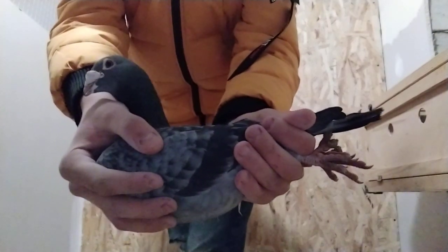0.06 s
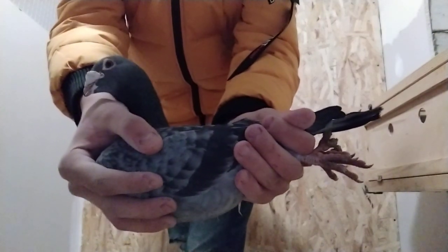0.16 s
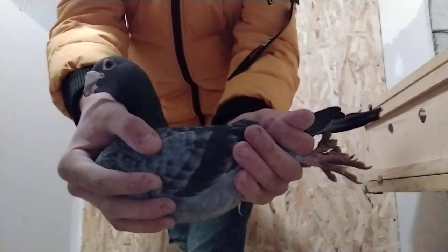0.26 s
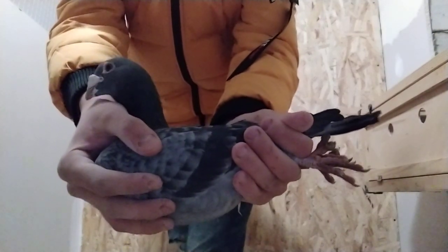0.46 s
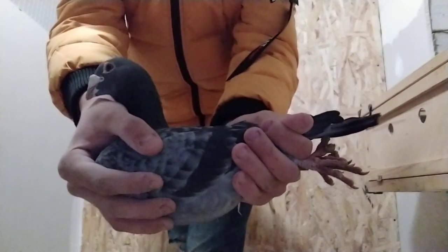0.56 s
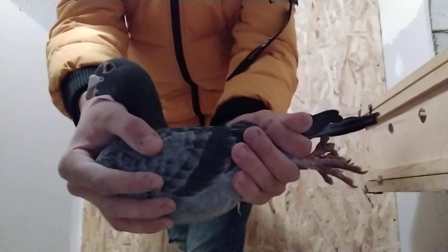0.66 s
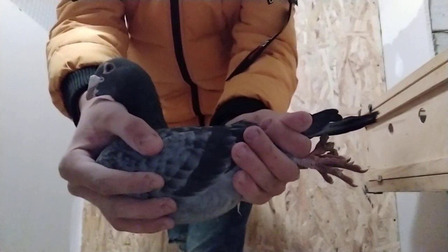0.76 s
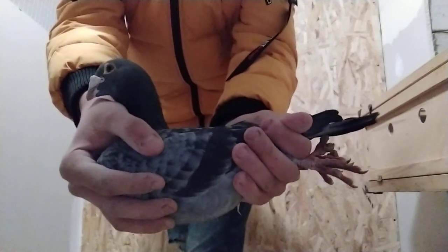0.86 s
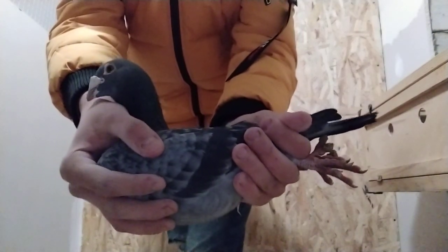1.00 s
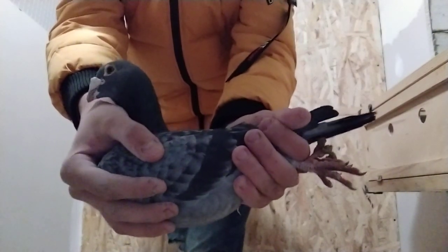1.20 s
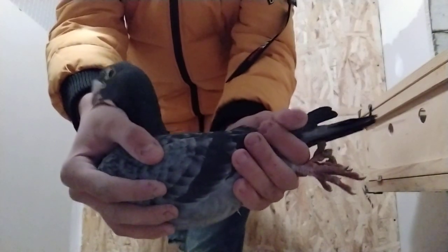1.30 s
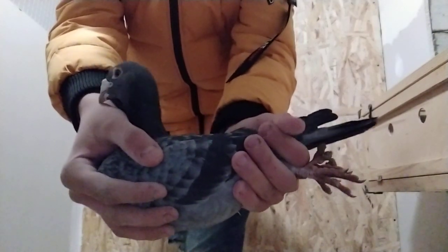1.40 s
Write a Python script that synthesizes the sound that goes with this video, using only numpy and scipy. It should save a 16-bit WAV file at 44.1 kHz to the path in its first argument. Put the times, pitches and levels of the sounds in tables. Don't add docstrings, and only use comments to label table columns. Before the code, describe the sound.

A pigeon coos in soft throaty pulses, then a wooden knock rattles in a small loft

```python
import sys
import numpy as np
from scipy import signal
from scipy.fft import rfft, irfft
from scipy.io import wavfile
from scipy.ndimage import uniform_filter1d, map_coordinates

SR = 44100
rng = np.random.default_rng(int(sys.argv[2]) if len(sys.argv) > 2 else 0)


def undo_db(level):
    steps = np.asarray(level, float) / 20
    return 10 ** steps


def wav_out(sig):
    wavfile.write(sys.argv[1], SR, np.round(np.clip(np.atleast_2d(sig).T, -1, 1) * 32767).astype(np.int16))


N = 63945
T = np.arange(N) / SR
PORTS = np.array([[1], [-1]])


def shape(x, points):
    hz, db = np.transpose(points)
    bins = np.maximum(np.fft.rfftfreq(x.shape[-1], 1 / SR), 1)
    gain = undo_db(np.interp(np.log(bins), np.log(hz), db))
    return irfft(rfft(x) * gain, x.shape[-1])


def unit(x):
    return x / np.sqrt(np.mean(x ** 2))


def walk(rate):
    hold = max(int(SR / rate), 40)
    steps = np.repeat(rng.standard_normal(N // 40 + 1), hold)[:N]
    return 1.52 * uniform_filter1d(uniform_filter1d(steps, hold), hold)


def place(x, pan_db, lag_ms):
    def late(share):
        return map_coordinates(x, [np.arange(N) - share * lag_ms * SR / 2000], order=3)
    return np.array([late(0.87) * undo_db(pan_db / 2), late(-1.044) * undo_db(-pan_db / 2)])


def pair(points, split_hz):
    middle, side = rng.standard_normal((2, N))
    side = shape(side, [(split_hz / 8, -14), (split_hz, 0)])
    return unit(shape(middle + side * PORTS, points))


def coo(curve, rough_db):
    # frequency in Hz, level in dB.
    throat = [(180, -1), (400, -6), (460, -9.5), (500, -20.5), (560, -21), (690, -29), (900, -41)]
    s, pitch, db = np.transpose(curve)
    throat_hz, throat_db = np.transpose(throat)
    hz = uniform_filter1d(np.interp(T, s, pitch), 200) * (1 + 0.0026 * rough_db * walk(61.1))
    level_db = np.interp(T, s, db, -120, -120) + rough_db * walk(90.96)
    env = uniform_filter1d(undo_db(level_db), 150)
    phase = 2 * np.pi * np.cumsum(hz) / SR
    voice = np.cos(phase)
    for k in (2, 3):
        voice += undo_db(np.interp(np.log(k * hz), np.log(throat_hz), throat_db)) * np.cos(k * phase)
    return np.sqrt(2) * env * voice


def early_coos():
    # time in seconds, pitch in Hz, level in dB.
    far_curve = [(0, 205.3, -54.5), (.04, 233.2, -65), (.06, 196.7, -56), (.09, 224.8, -48.5),
                 (.115, 249, -49), (.14, 314, -53), (.162, 371, -50.5), (.185, 379, -52.5),
                 (.21, 416, -68.5)]
    # time in seconds, pitch in Hz, level in dB.
    thin_curve = [
        (.4, 640, -66),
        (.43, 660, -59),
        (.48, 652, -58),
        (.495, 640, -68),
    ]
    return coo(far_curve, rough_db=3.5) + coo(thin_curve, rough_db=2.3)


def late_coos():
    # time in seconds, pitch in Hz, level in dB.
    long_curve = [(.494, 482.6, -52), (.506, 397.8, -38), (.52, 312.3, -38), (.546, 298.2, -36.5),
                  (.562, 255.2, -31.5), (.59, 229.8, -29.5), (.662, 229.6, -32), (.686, 196.6, -48),
                  (.7, 200, -47)]
    # time in seconds, pitch in Hz, level in dB.
    tail_curve = [(.7, 199.8, -46), (.715, 206.6, -47.5), (.735, 229, -42.5), (.762, 222.4, -44.5),
                  (.778, 206, -55.5), (.8, 226.7, -61.5), (.835, 239, -47), (.865, 233, -92.5)]
    return coo(long_curve, rough_db=0.83) + coo(tail_curve, rough_db=1.04)


def gulps():
    # centre in seconds, pitch in Hz, peak in dB, length in ms.
    pulses = [(0.248, 363, -25.5, 4.5), (0.262, 310, -42.5, 4.4), (0.283, 381, -30.5, 6.8),
              (0.303, 350, -34.5, 1.5), (0.317, 369.4, -37.5, 13.6), (0.349, 261.6, -27, 8.8),
              (0.378, 304, -32, 9.4), (0.393, 296, -41, 10.7), (0.418, 320, -43.5, 5.6),
              (.44, 290, -50.5, 8.9), (0.492, 278, -48, 24), (.54, 402, -37, 7.8), (0.567, 296, -35, 4.5),
              (0.595, 294, -40, 22), (.68, 376, -42.5, 9.1), (.708, 423, -48.5, 8.8),
              (0.734, 395, -45.5, 11), (.75, 455, -46, 13), (.38, 510, -46, 11), (.1, 453, -49.5, 16)]
    octave_db, rasp_db, rasp_extra_ms = -27, -18, 6
    breath = rng.standard_normal(N)
    rasp = unit(shape(breath, [(250, -31.5), (380, 5.5), (520, 7.5), (700, -39.5)]))
    out = np.zeros(N)
    for s, hz, db, ms in pulses:
        since_ms = (T - s) * 1000
        phase = 2 * np.pi * (hz * (T - s) + rng.random())
        tone = np.cos(phase) + undo_db(octave_db) * np.cos(2 * phase)
        out += undo_db(db) * np.exp(-(since_ms / ms) ** 2) * tone
        out += undo_db(db + rasp_db) * np.exp(-(since_ms / (ms + rasp_extra_ms)) ** 2) * rasp
    return out


def rustle_strokes():
    # start in seconds, claw, feather and hollow board levels in dB, length in ms.
    moves = [(0.032, -54.5, -60, -70, 17), (0.036, -56, -54, -88, 1.1), (0.0442, -62, -47.5, -79, 1.1),
             (.058, -65, -64.5, -65, 10.4), (0.143, -83, -67.5, -78, 8), (0.196, -63.5, -63, -57, 25),
             (0.209, -68.5, -74, -66, 9.1), (.252, -82.5, -56, -79.5, 17), (0.263, -68.5, -57, -62.5, 42),
             (0.276, -79, -53.5, -76, 2.7), (0.372, -59, -69, -58, 8.8), (0.381, -65.5, -80, -56.5, 10.5),
             (0.446, -100, -69.5, -81, 4.5), (0.55, -63.5, -67, -86, 13.4), (0.59, -64, -75.5, -68, 6.3),
             (0.639, -58.5, -74, -69.5, 8.6), (0.734, -66, -71, -76.5, 7.6), (0.764, -52, -59, -63.5, 24.3),
             (0.778, -47.5, -51, -61, 10.7), (0.824, -54, -54, -59, 19), (0.833, -65, -56, -85, 4),
             (0.89, -53, -78, -47, 9), (0.913, -69, -68, -63.5, 13), (1.088, -55, -59, -52.5, 16.6),
             (1.118, -51.5, -58, -78, 8.5), (1.139, -37.5, -44.5, -47, 16.3), (1.19, -55, -58, -64, 9.2),
             (1.215, -60.5, -66, -54, 26), (1.314, -51.5, -51, -82, 20.4), (1.321, -57, -53, -77, 1.8),
             (1.332, -60, -45, -78, 2), (1.343, -51.5, -58.5, -64.5, 13.7), (1.44, -55.5, -71, -68, 12)]
    envs = np.zeros((3, N))
    for s, *levels_db, ms in moves:
        u = np.clip((T - s) * 1000 / ms, 0, 40)
        stroke = 2.105 * (1 - np.exp(-u / 0.24)) * np.exp(-u)
        envs += undo_db(levels_db)[:, None] * stroke
    return envs


def claws_on_board(claw_env, board_env):
    # frequency in Hz, density in dB per Hz.
    scratch = [(200, -5), (400, 9), (600, -2.5), (850, 4.5), (1300, -0.5), (2200, -4), (3500, -7.5),
               (6500, -17)]
    # frequency in Hz, density in dB per Hz.
    hollow = [(450, -24), (600, 5), (700, -13.5), (835, 6), (890, -0.5), (960, 1.5), (1200, -7.5),
              (1700, -47.5)]
    scrape = unit(shape(rng.standard_normal(N), scratch + [(10000, -53)])) * claw_env
    hum = unit(shape(rng.standard_normal(N), hollow)) * board_env
    return (scrape + hum) * undo_db(2 * walk(300))


def feathers_and_jacket(feather_env):
    # frequency in Hz, density in dB per Hz.
    vanes = [(2000, -6), (3500, -13.5), (5500, -16.5), (7500, -4.5), (9200, 0.5), (10300, -6.5),
             (11800, -20.5), (15500, -50.5)]
    # frequency in Hz, density in dB per Hz.
    fabric = [(1500, -13.5), (3000, -12.5), (6000, -14), (9000, 0.5), (10500, -10), (13500, -18.5),
              (15500, -14.5)]
    # time in seconds, level in dB.
    sleeve = [(0.862, -72), (.95, -61.5), (1.049, -56.5), (1.125, -57), (1.22, -73), (1.3, -63.5),
              (1.45, -64)]
    s, db = np.transpose(sleeve)
    cloth = pair(fabric, 2700) * undo_db(np.interp(T, s, db, -120) + 1.7 * walk(25))
    rustle = pair(vanes, 2300) * feather_env * undo_db(2 * walk(400))
    return (rustle + cloth) * undo_db(-4.5 / 2 * PORTS)


def knock():
    # time in seconds, peak in dB, push in ms, favoured Hz of the spot struck.
    blows = [
        (1.139, -30, 0.096, 1960),
        (1.1426, -32.5, .2, 453),
        (1.145, -24.5, 0.12, 840),
        (1.150, -29, 0.22, 795),
        (1.156, -27, 0.11, 1900),
        (1.161, -28.5, 0.62, 123),
        (1.166, -24, 0.61, 810),
        (1.188, -34.5, .6, 423),
        (1.217, -39, 0.75, 556),
    ]
    # frequency in Hz, level in dB, 60 dB decay in seconds.
    modes = [(119, -3.5, 0.064), (350, -8, 0.089), (424, -9, 0.065), (520, -10.5, .05), (680, -14, 0.035),
             (795, -1.5, 0.028), (839, 1.5, 0.039), (1134, -3, 0.04), (1294, -1.5, 0.018),
             (1510, -10, 0.01), (1678, -2, 0.021), (1960, -7.5, 0.054), (2303, -12.5, 0.094),
             (2884, -10.5, 0.027)]
    mode_hz, mode_db, t60 = np.transpose(modes)
    u = np.arange(SR // 4) / SR
    decay = np.exp(-np.log(1000) * u / t60[:, None])
    ringing = np.sin(2 * np.pi * mode_hz[:, None] * u) * decay
    out = np.zeros(N)
    for s, db, push_ms, spot_hz in blows:
        chance = rng.standard_normal(len(modes))
        octaves_away = np.abs(np.log2(mode_hz / spot_hz))
        gain = undo_db(mode_db + 2.0 * chance - 3.5 * octaves_away) * np.sign(chance[::-1])
        ring = (gain / (1 + (mode_hz * push_ms / 1000) ** 2)) @ ringing
        i = int(s * SR)
        out[i:i + len(u)] += undo_db(db) * ring[:N - i]
    return out


def floor_thuds():
    # centre in seconds, frequency in Hz, peak in dB, length in ms.
    steps = [
        (0.406, 105.7, -57, 19),
        (0.67, 51, -61.5, 25),
        (0.907, 61.3, -55.5, 28),
        (0.91, 165, -56.5, 51),
        (1.21, 165, -50, 21),
    ]
    out = np.zeros(N)
    for s, hz, db, ms in steps:
        out += undo_db(db) * np.exp(-((T - s) * 1000 / ms) ** 2) * np.sin(2 * np.pi * hz * T)
    return out * undo_db([[2.1], [-2.2]])


def other_birds():
    mutter = pair([(150, -27), (220, 7), (520, 2.5), (800, -38.5)], 1100)
    fade_db = np.interp(T, [0, .47, .6, .98, 1.1, 1.36], [4.0, -5.5, 0.5, -18.5, -28, -11])
    return mutter * undo_db(-54.5 + fade_db + 3.0 * walk(23.27)) * undo_db(2.4 * PORTS)


def room_tone():
    # frequency in Hz, density in dB per Hz.
    air = [(20, -2.5), (60, -1), (85, -15.5), (200, 2.5), (420, -14), (1400, -23), (5400, -42.5),
           (9300, -28), (11200, -59.5), (15500, -105)]
    return undo_db(-59.5 + 1.5 * walk(6.9)) * pair(air, 1600) * undo_db(2.1 * PORTS)


def room(x):
    # frequency in Hz, 60 dB decay in seconds.
    decays = [(150, 0.53), (600, 0.21), (2500, 0.18), (9000, 0.14)]
    decay_hz, decay_s = np.transpose(decays)
    u = np.arange(SR // 2) / SR
    tail = np.zeros((2, len(u)))
    for hz in 125 * 2 ** np.arange(7):
        middle, side = rng.standard_normal((2, len(u)))
        noise = middle + min(hz / 600, 1) * side * PORTS
        band = unit(shape(noise, [(hz / 2, -30), (hz / 1.503, 0), (hz * 1.26, 0), (hz * 2, -30)]))
        t60 = np.interp(np.log(hz), np.log(decay_hz), decay_s)
        tail += np.sqrt(hz) * band * np.exp(-np.log(1000) * u / t60)
    tail *= np.clip(u / 0.0038 - .6, 0, 1)
    tail /= np.sqrt(np.sum(tail ** 2) / 2)
    return undo_db(-3.5) * signal.fftconvolve(x[None], tail, axes=1)[:, :N]


def scene():
    pulses = gulps()
    turn = np.clip((T - .46) / .02, 0, 1)
    early = early_coos() + pulses * (1 - turn)
    late = late_coos() + pulses * turn
    claw_env, feather_env, board_env = rustle_strokes()
    claws = claws_on_board(claw_env, board_env)
    feathers = feathers_and_jacket(feather_env)
    box = knock()

    send = undo_db(-5.5) * (early + late) + claws + undo_db(-6.5) * box + undo_db(-3.5) * feathers[1]
    wet = shape(room(send), [(130, -16), (240, -8), (330, 0.011)])
    birds = place(early, 5.5, .35) + place(late, 5.5, -0.32)
    wood = place(claws + box, 2.5, -0.4176)
    background = floor_thuds() + other_birds() + room_tone()
    return birds + wood + feathers + wet * undo_db(1.2 * PORTS) + background


def top_cut(x):
    return signal.sosfilt(signal.butter(12, 15610, fs=SR, output="sos"), x)


def record(dry):
    return top_cut(dry)


dry = scene()
out = record(dry)
wav_out(out)
```